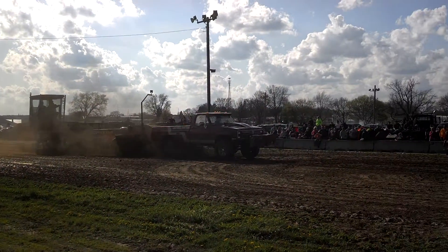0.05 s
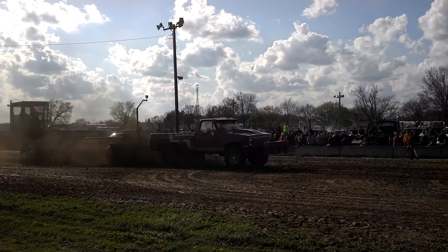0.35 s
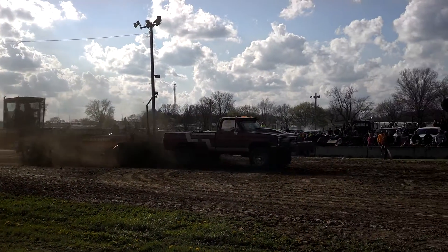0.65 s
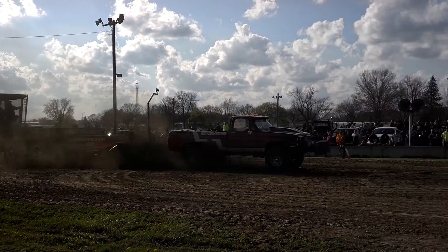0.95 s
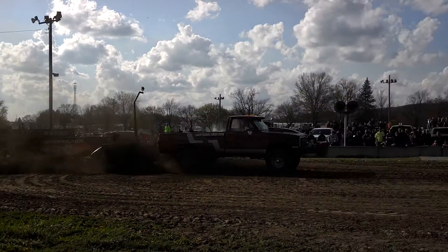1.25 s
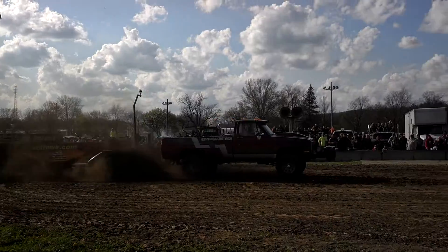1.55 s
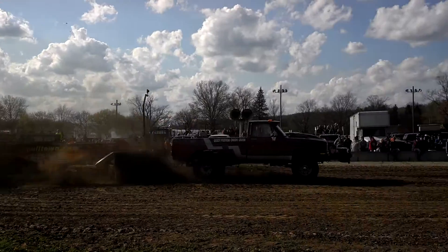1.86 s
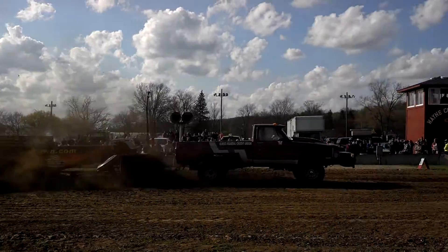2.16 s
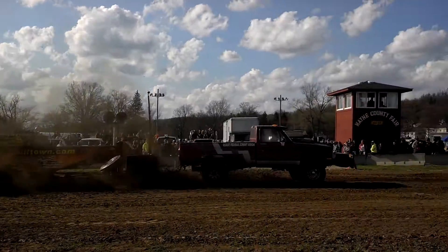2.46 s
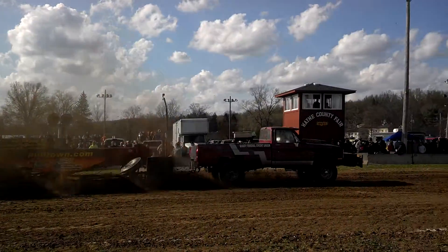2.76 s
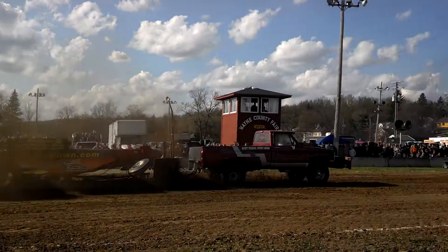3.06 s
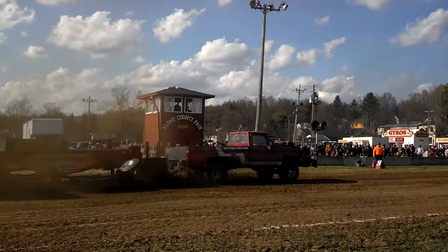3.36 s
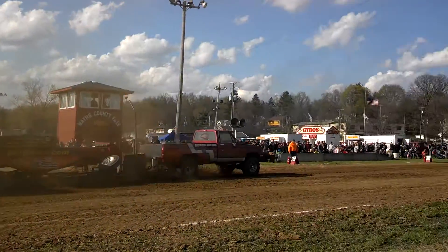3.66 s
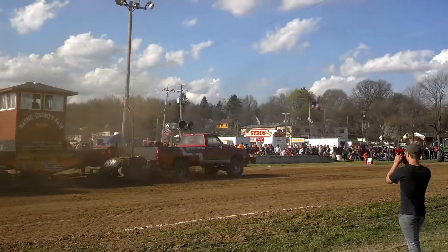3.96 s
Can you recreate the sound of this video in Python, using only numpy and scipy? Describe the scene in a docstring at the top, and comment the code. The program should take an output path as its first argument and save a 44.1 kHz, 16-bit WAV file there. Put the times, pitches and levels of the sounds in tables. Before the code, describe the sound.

A pulling truck's engine roars at full throttle for all four seconds, close and nearly overloading the microphones. The high revs dip and recover slightly, with a pulsing exhaust rasp over steady hiss. The blaring tone shifts as the truck passes, around 1, 2 and 2.7 seconds. From about 3.5 seconds a thin hiss flares, the revs sag briefly and the blare dulls a little.

```python
"""A V8 pulling truck drags a sled past at full throttle on a dirt track.
Its revs dip and recover as the tyres bite. The open exhaust blares a stack of orders (harmonics
of the engine cycle) whose balance shifts as the pipes turn past. Turbulent gas adds a rasp that
pulses with the firings, under a steadier hiss. Two close microphones follow the truck,
widened to stereo by a short delay, at the edge of overload."""
import sys
import numpy as np
from scipy import signal
from scipy.fft import rfft, irfft, next_fast_len
from scipy.io import wavfile
from scipy.ndimage import uniform_filter1d, minimum_filter1d

SR = 44100
rng = np.random.default_rng(int(sys.argv[2]) if len(sys.argv) > 2 else 0)


def to_wav(s):
    """Save 16-bit WAV."""
    ch = np.atleast_2d(s).T  # columns
    pcm = np.round(np.clip(ch, -1, 1) * 32767)  # PCM
    wavfile.write(sys.argv[1], SR, pcm.astype(np.int16))


N = 176400
T, HZ = np.arange(N) / SR, np.fft.rfftfreq(N, 1 / SR)

# the microphones' difference against their sum: frequency_hz, level_db, phase_rad, likeness (0-1)
MIC_PAIR = [(55, 16.1, 4.5, 0.3), (107, 6.5, -4.4, 0.2), (168, -5.5, -5.0, 1), (214, -2, -4, 0.37),
            (265, -3.5, -5, 0.91), (320, -1, -5, 0.56), (374, 5.5, -5.5, 0.7), (441, 1, -5, 0.7),
            (520, 4, -7.5, 0.8), (546, -0.7, -7.5, 0.74), (680, -4.5, -9.5, 0.5), (855, 3, -5.5, 0.75),
            (990, -0.6, -7, 0.82), (1710, 0.1, -7, 0.2), (2130, 4, -7, 0.7), (3300, 3.5, -8.5, 0.97),
            (4700, -1, -8, 0.4), (6300, 1.5, -8, 0.5), (9500, 1.2, -7.5, 0.37), (15000, -0.5, -9, 0.15)]


def amp(db):
    """Decibels to gain."""
    return 10 ** (np.asarray(db) / 20)


def curve(table):
    """The columns of a time table at every sample."""
    times, *columns = np.transpose(table)
    return np.squeeze([np.interp(T, times, column) for column in columns])


def spectrum(table, hz):
    """The columns of a frequency table at hz, interpolated on a log axis."""
    points_hz, *columns = np.transpose(table)
    return np.squeeze([np.interp(np.log(hz + 1), np.log(points_hz), column) for column in columns])


def drift(rate_hz, count=1):
    """Rows of smooth random motion, rms about 1."""
    steps = 800
    hz = np.fft.rfftfreq(steps, N / SR / steps)
    rows = irfft(rfft(rng.standard_normal((count, steps))) / np.sqrt(1 + (hz / rate_hz) ** 4))
    return np.array([np.interp(T, np.linspace(0, N / SR, steps), row / row.std()) for row in rows])


def flaring_hiss(centre_hz=4040, width_hz=380):
    """A narrow band of hiss that comes and goes with the load."""
    # swells of the hiss: time_s, level_db
    swells = [(0, -31), (.08, -31.5), (.35, -28.5), (.48, -42), (1.9, -42), (2.05, -43), (2.5, -41),
              (3.3, -40), (3.45, -33), (3.62, -25), (3.72, -33), (3.8, -27), (4, -32)]
    band = np.exp(-.5 * ((HZ - centre_hz) / width_hz) ** 2)
    hiss = irfft(rfft(rng.standard_normal(N)) * band)
    return hiss / hiss.std() * amp(curve(swells))


def gas_rasp(cycles, puff_decay_cycles=.11, rasp_boost_db=.5, trim_db=-.5):
    """Turbulent gas: a puff of rasp at each firing, under a steadier mechanical hiss."""
    # where the near bank's four cylinders fire: position_cycles
    firings = np.array([0, 3, 5, 6]) / 8
    # strength of each of those cylinders: level_db
    cylinder_db = [3.4, -0.16, -1.4, 2]
    # tone colour of rasp and hiss: frequency_hz, density_db
    colour = [(25, -91), (55, -75), (100, -66.5), (200, -61), (400, -54), (700, -58.5), (1100, -57),
              (1400, -61), (1750, -57), (2200, -58.5), (3100, -55), (4100, -56.5), (5000, -60.5),
              (6500, -67), (9000, -76), (12500, -77.5), (15500, -78.5)]
    # band faders, each taken against its own mean: time_s, rasp_db, hiss_db, top_db
    faders = [(0.0, -22.5, -25.5, -39), (0.66, -22, -26, -38.5), (0.71, -17.5, -26.5, -38),
              (0.97, -21, -28, -39), (1.15, -19, -25.5, -38), (1.43, -21, -26, -37.5),
              (1.76, -18.5, -26.5, -35.5), (3.35, -19, -23.5, -33.5), (3.43, -18, -22, -32.5),
              (3.75, -23, -22, -35), (3.88, -24, -24, -34.5), (4.0, -27.5, -21.5, -37)]
    # crossfades, rasp to hiss and hiss to top treble: start_hz, end_hz, start_hz, end_hz
    crossover_hz = [1940, 3370, 4440, 6800]
    puffs = sum(amp(db) * np.exp(-((cycles - at) % 1) / puff_decay_cycles)
                for at, db in zip(firings, cylinder_db))
    puffs = puffs / puffs.mean() - 1
    common, separate = rfft(rng.standard_normal((2, N)))
    likeness = np.clip(spectrum(MIC_PAIR, HZ)[2], 0, 1)
    noise = irfft(np.array([common, likeness * common + np.sqrt(1 - likeness ** 2) * separate]))
    above_rasp = np.interp(HZ, crossover_hz[:2], [0, 1])
    top = np.interp(HZ, crossover_hz[2:], [0, 1])
    bands = [amp(rasp_boost_db) * (1 - above_rasp), above_rasp - top, top]
    pulse_depths = [.64, .17, .17]
    mix = 0
    for band, db, depth in zip(bands, curve(faders), pulse_depths):
        pulse = 1 + depth * puffs
        pulse /= np.sqrt(np.mean(pulse ** 2))
        mix = mix + band * rfft(noise * amp(db - db.mean()) * pulse)
    return irfft(mix * amp(trim_db + spectrum(colour, HZ))) * np.sqrt(SR / 2)


def body_levels():
    """Level in dB of each supporting order, shifting as the pipes turn past."""
    # where the truck is: time_s, view (0 approaching, 1 near, 2 abeam, 3 past)
    pass_by = [(0, 0), (1.05, 0), (1.2, 1), (1.75, 1), (1.9, 2), (2.55, 2), (2.85, 3), (4, 3)]
    # exhaust tone from each side: order, approaching_db, near_db, abeam_db, past_db
    orders_by_view = [(2, -37.5, -40, -40, -41), (4, -42, -26.5, -40.5, -36), (6, -35, -35, -41, -28),
                      (7, -27, -45, -26.5, -32), (9, -41, -28.5, -35, -25), (10, -34, -34, -34, -29.5),
                      (11, -27, -26.5, -31, -27), (12, -57, -45, -27, -31), (14, -49, -26, -40.5, -29.5),
                      (16, -39, -36.5, -45.5, -34.5), (17, -31.5, -39.5, -37, -40),
                      (18, -33, -28, -34, -33.5), (20, -29.5, -40, -37, -43), (21, -34, -31.5, -37, -32.5),
                      (22, -44, -37.5, -41, -34.5)]
    # faint high orders: order, level_db
    high_orders = [(23, -34.5), (24, -41), (25, -41.5), (26, -36), (27, -44), (28, -41.5), (29, -43.5),
                   (30, -40.5), (31, -35), (32, -42.5), (33, -36), (34, -37.5), (35, -38.5), (36, -42.5),
                   (37, -39.5), (38, -44), (39, -34.5), (40, -43), (41, -50), (42, -35.5), (43, -41),
                   (44, -35.5)]
    # bark from 300 to 650 Hz: time_s, gain_db
    bark = [(0.0, 3.5), (0.2, -3), (0.4, 2.5), (0.6, -1), (1.0, -1.5), (1.3, 3.5), (1.6, -2.5), (2.6, -3),
            (2.7, 0.5), (3.5, 2), (3.7, 0), (4.0, 1)]
    # snarl from 1.05 to 1.6 kHz, taken against its own mean: time_s, level_db
    snarl = [(0.0, -26), (0.81, -30), (0.83, -33.5), (1.26, -26), (1.29, -29.5), (2.55, -27.5),
             (2.73, -25.5), (3.95, -23.5), (4.0, -21)]
    view, bark_db, snarl_db = curve(pass_by), curve(bark), curve(snarl)
    levels = {round(order): db for order, db in high_orders}
    for order, *view_db in orders_by_view:
        levels[round(order)] = np.interp(view, range(4), view_db) + bark_db * (6 <= order <= 12)
    for order in range(20, 31):
        levels[order] = levels[order] + snarl_db - snarl_db.mean()
    return levels


def lead_levels():
    """Level in dB of each order that stands out with a swell of its own."""
    # throb from one bank's uneven firing, orders 3, 5 and 8: time_s, level_db
    throb_3 = [(0.0, -22.5), (0.2, -28), (0.3, -22), (1.1, -21), (1.2, -26.5), (1.3, -21.5), (1.7, -23.3),
               (1.9, -21), (2.7, -23), (3.0, -26.5), (3.1, -25), (3.5, -25.5), (4.0, -21.5)]
    throb_5 = [(0.0, -19.5), (0.7, -27.1), (0.8, -21.5), (1.1, -29), (1.8, -21), (1.9, -30), (2.0, -19.0),
               (2.3, -22.5), (2.9, -17.5), (3.1, -20), (3.3, -14.5), (3.9, -23), (4.0, -16.5)]
    throb_8 = [(0.0, -29), (0.2, -27), (0.3, -30), (0.5, -28.5), (1.4, -28), (1.7, -35), (1.8, -26),
               (2.6, -28), (2.8, -23.5), (3.2, -20), (3.4, -32), (3.6, -21.5), (4.0, -27.5)]
    # blare in the pipes, orders 13, 15 and 19: time_s, level_db
    blare_13 = [(0.0, -28.5), (0.6, -26.5), (1.0, -28.5), (1.2, -21.5), (1.4, -26), (1.7, -25),
                (2.0, -22.5), (2.3, -35.5), (3.0, -20.8), (3.4, -27.5), (3.6, -18.5), (3.8, -30),
                (4.0, -16.5)]
    blare_15 = [(0.0, -31), (0.5, -33), (0.6, -46), (1.4, -24.5), (1.7, -31), (2.3, -22.5), (2.6, -33),
                (3.3, -30), (3.5, -34), (3.8, -23.5), (4.0, -38)]
    blare_19 = [(0.0, -39), (0.3, -31), (0.5, -48), (1.2, -29), (1.7, -36), (2.3, -25.5), (2.6, -57),
                (2.7, -26.5), (3.0, -42), (3.3, -23.5), (4.0, -37)]
    # whine near 1.7 kHz: time_s, level_db
    whine = [(0.0, -42.5), (0.8, -30.5), (0.9, -39), (1.1, -36), (1.3, -39), (1.7, -23), (1.9, -32),
             (3.1, -33), (3.2, -28.5), (3.7, -40), (4.0, -37)]
    leads = {3: throb_3, 5: throb_5, 8: throb_8, 13: blare_13, 15: blare_15, 19: blare_19, 31: whine}
    return {order: curve(table) for order, table in leads.items()}


def pipe_phase(hz, lag_s=.014, chirp_low_hz=369.2, chirp_top_hz=850, scatter_rad=.28):
    """Phase of one order: low orders ring longest in the pipe, so each beat chirps downward."""
    chirp = np.pi * lag_s * (hz ** 2 - max(hz - chirp_top_hz, 0) ** 2) / chirp_top_hz
    # outside the chirp's range the orders fall out of step
    spread = max(hz / chirp_top_hz, chirp_low_hz / hz, 1) ** 4
    return chirp + scatter_rad * spread * rng.standard_normal()


def exhaust(cycles, waver_depth=.66, waver_full_hz=786):
    """The open pipes sound the orders of the engine cycle, along two paths that waver separately."""
    # the blare above 450 Hz dulls as the truck pulls away: time_s, gain_db
    pull_away = [(3.58, 0), (3.75, -2), (4, -2)]
    away_db, leads = curve(pull_away), lead_levels()
    levels = {**body_levels(), **leads}
    paths = np.zeros((2, N))
    for order, db in sorted(levels.items()):
        hz = order * cycles[-1] / T[-1]
        phase = 2 * np.pi * order * cycles + pipe_phase(hz)
        # reflections make the weak, high orders waver most
        waver = waver_depth * min(hz / waver_full_hz, 1) * (.72 if order in leads else 1)
        in_phase, quadrature = waver * drift(rate_hz=5.6, count=4).reshape(2, 2, N)
        direct = np.sqrt(2 * (1 - waver ** 2))
        tone = (direct + in_phase) * np.cos(phase) + quadrature * np.sin(phase)
        paths += amp(db + away_db * (order >= 9)) * tone
    return paths


def microphones(paths, delay_s=16 / SR, width_below_hz=520):
    """The pair's sum and difference, each combed by the widening delay, give left and right."""
    # stereo width of the low end: time_s, side_gain_db
    width = [(0, 4), (.7, 0.5), (1.4, 2.5), (2.1, 2.5), (2.7, 5.5), (3.3, 3), (3.65, 7), (4, 6.5)]
    size = next_fast_len(N + SR // 2)
    hz = np.fft.rfftfreq(size, 1 / SR)
    total, difference = rfft(paths * signal.windows.tukey(N, .002), size)
    side_db, side_phase, _ = spectrum(MIC_PAIR, hz)
    angle = np.pi * hz * delay_s
    mid_comb = np.sin(angle) / (np.sin(np.minimum(angle, np.pi / 2)) + 1e-9)  # flat to its first peak
    mid = irfft(total * mid_comb, size)[:N]
    side_spectrum = difference * np.cos(angle) * amp(side_db) * np.exp(1j * side_phase)
    low_side = irfft(side_spectrum / (1 + (hz / width_below_hz) ** 4), size)[:N]
    side = irfft(side_spectrum, size)[:N] + low_side * (amp(curve(width)) - 1)
    return np.array([mid + side, mid - side])


def scene(jitter_s=.00003, flutter_db=.57):
    """One crankshaft drives the exhaust tones and the rasp."""
    # engine speed, two turns of the crank to a cycle: time_s, cycle_rate_hz
    revs = [(0.0, 53.47), (0.14, 55.9), (0.22, 56.17), (0.38, 52.7), (0.63, 55.26), (0.76, 53.98),
            (0.98, 53.54), (1.15, 55.14), (1.26, 54.93), (1.42, 52.41), (1.63, 55.54), (1.86, 52.85),
            (2.06, 53.83), (2.28, 53.37), (2.45, 53.1), (2.66, 52.2), (2.86, 53.3), (3.12, 52.62),
            (3.5, 53.76), (3.62, 53.55), (3.77, 50.97), (3.87, 53.13), (4.0, 53.3)]
    cycle_hz = curve(revs)
    cycles = np.cumsum(cycle_hz) / SR + cycle_hz * jitter_s * drift(rate_hz=34)[0]  # uneven combustion
    strength = 1 + .04 * drift(rate_hz=75)[0]  # firings differ in strength
    flutter = amp(flutter_db * drift(rate_hz=9.5)[0])  # the rasp and hiss flutter slightly in level
    return microphones(strength * exhaust(cycles) + flutter * (gas_rasp(cycles) + flaring_hiss()))


def record(dry, limiter_s=.0092, cutoff_hz=15900):
    """A fast limiter holds the tallest peaks near full scale; a steep low-pass trims the top."""
    window = round(limiter_s * SR)
    peak_gain = 1 / np.maximum(abs(dry).max(0), 1)
    gain = uniform_filter1d(minimum_filter1d(peak_gain, window), window)
    lowpass = signal.firwin(511, cutoff_hz, window=("kaiser", 9), fs=SR)
    return signal.oaconvolve(dry * gain, lowpass[None], "same")


dry = scene()
out = record(dry)
to_wav(out)
```